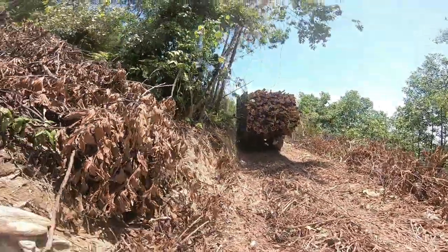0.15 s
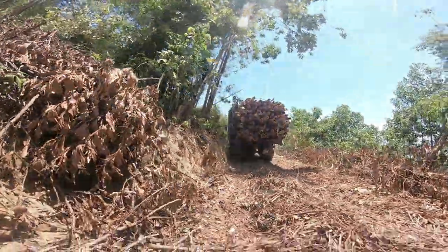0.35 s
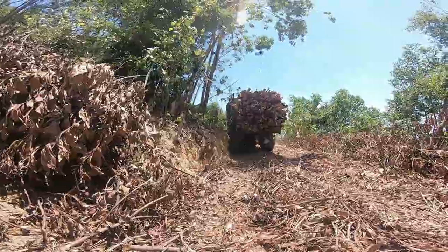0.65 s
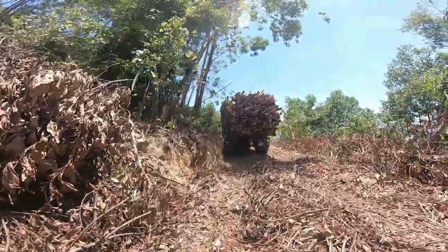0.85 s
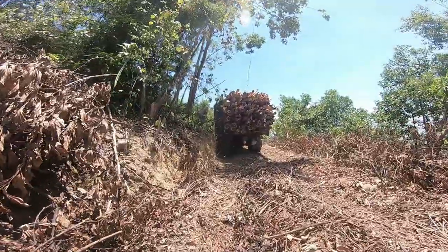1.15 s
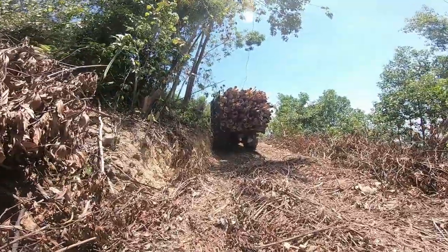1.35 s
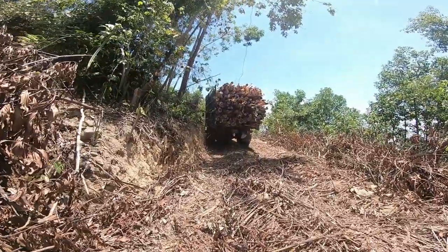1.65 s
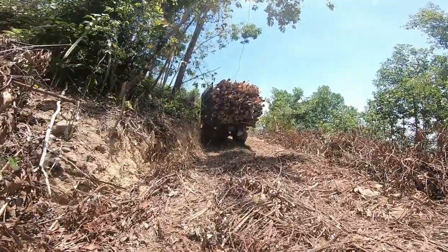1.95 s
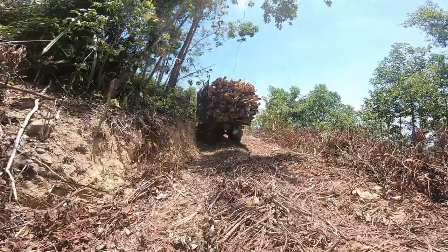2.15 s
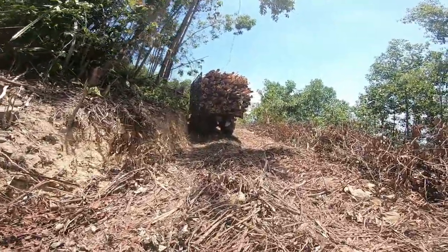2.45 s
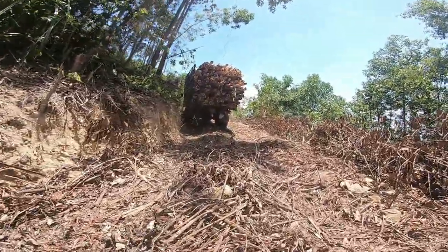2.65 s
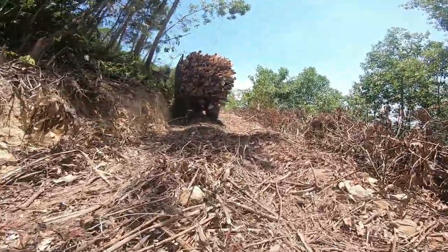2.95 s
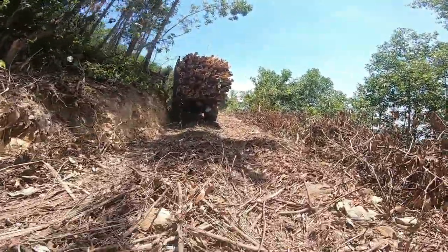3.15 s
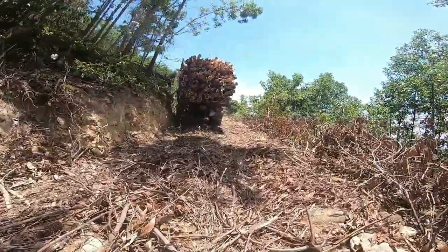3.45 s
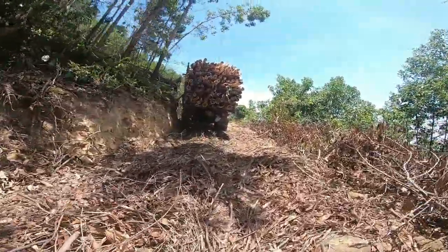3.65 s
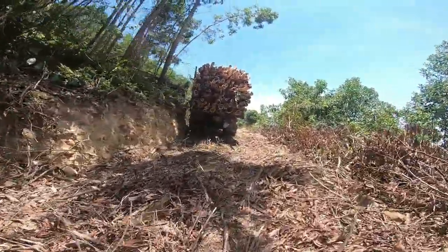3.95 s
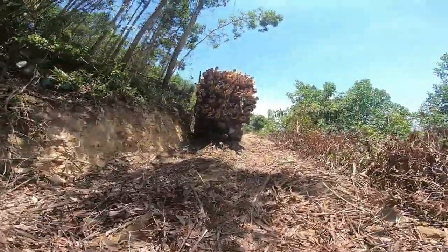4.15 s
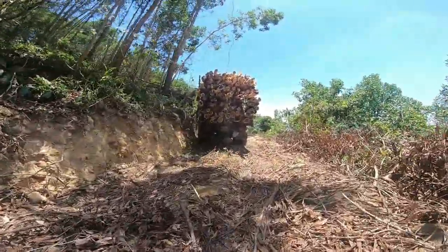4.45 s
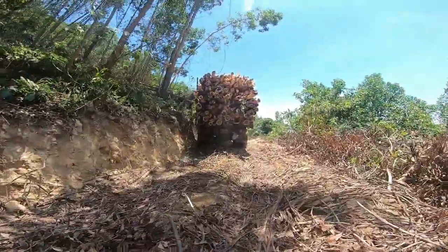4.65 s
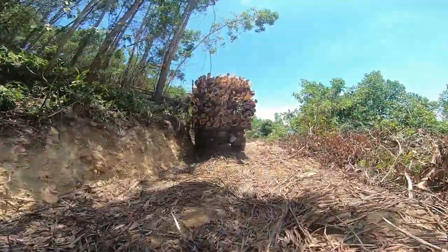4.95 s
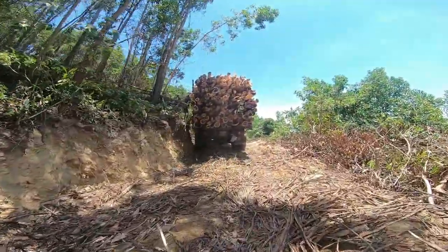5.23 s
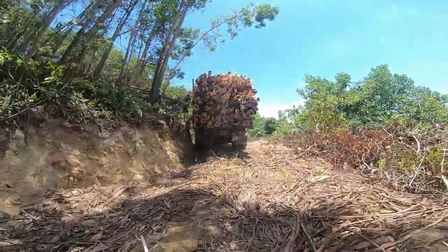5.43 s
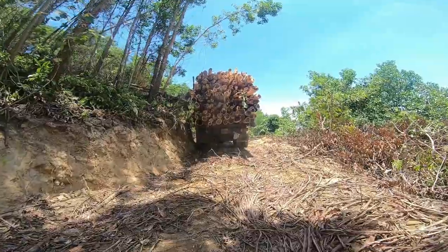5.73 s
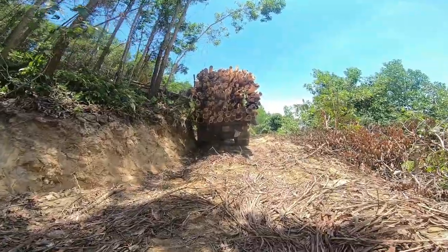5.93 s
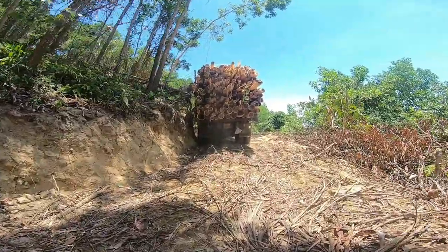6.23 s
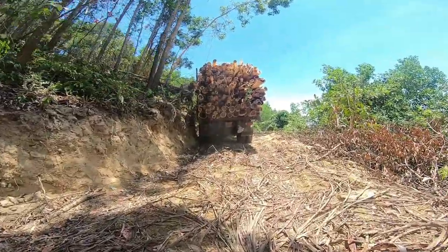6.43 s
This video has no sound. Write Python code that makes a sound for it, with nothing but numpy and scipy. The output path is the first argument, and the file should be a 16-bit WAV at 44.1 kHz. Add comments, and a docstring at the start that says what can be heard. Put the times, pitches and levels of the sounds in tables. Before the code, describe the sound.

A loaded diesel truck crawls along a forest track, heard from behind in the open air. Its uneven exhaust throbs at nearly steady revs over mechanical clatter and hiss. Close to the microphone, dry leaves and twigs crunch and snap as if underfoot, once near the start and then repeatedly. About halfway the engine takes up the load and pulls hard, then eases a little as a last few sticks break.

```python
"""A loaded four-cylinder diesel truck crawls along a forest track at nearly steady revs, heard from behind.
From the start its uneven exhaust throbs once an engine cycle, over a mechanical clatter and a hiss.
Dry leaves and twigs crunch and snap close by, as under footsteps, at about 0.5 s and from 1.5 s to 4 s.
From about 3 s the engine takes up the load and pulls hardest just after 5 s.
It then eases a little, while a last few sticks break."""
import sys
import numpy as np
from scipy import signal
from scipy.fft import rfft, irfft, next_fast_len
from scipy.io import wavfile
from scipy.ndimage import uniform_filter1d

SR = 44100
rng = np.random.default_rng(int(sys.argv[2]) if len(sys.argv) > 2 else 0)


def to_wav(sig):
    """Store sig (one row per channel, or 1-D mono) as 16-bit WAV at the path in sys.argv[1].

    Samples outside -1..1 are clipped; the rate is SR.
    """
    pcm = np.clip(np.atleast_2d(sig), -1, 1) * 32767
    pcm = np.round(pcm).astype(np.int16)
    wavfile.write(sys.argv[1], SR, pcm.T)  # frames by channels


N = 290617
TIME = np.arange(N) / SR
CUTOFF_HZ = 15700
GLIDE_PER_S = .035   # hiss bands and echo colour creep up by this share of their pitch as the truck rolls

# pitches at which the engine block and chassis ring: f/Hz, width/Hz, level/dB
BLOCK_RESONANCES = [(309, 14, -3), (403, 17, -1), (473, 55, -1), (600, 24, -2), (674, 34, -2.5),
                    (735, 26, -4), (789, 34, -7)]
# tone colour of dry leaves and twigs: f/Hz, level/dB
LEAF_COLOUR = [(300, -11), (700, 3.5), (1700, 7.5), (3300, 4), (5000, -0.5), (8000, -2.5), (10200, -6.5),
               (12000, -19.5), (16000, -29.5)]


def truck(rasp_db, hiss_db, width_db):
    """Exhaust, clatter, rasp, hiss and whine all keep time with the turning engine."""
    # engine speed as the driver feeds and eases the throttle: t/s, speed/rpm
    revs = [(0.0, 1778), (0.48, 1847), (1.24, 1845), (2.1, 1918), (2.57, 1803), (3.27, 1863), (3.6, 1920),
            (4.18, 1879), (4.65, 1889), (5.3, 1801), (5.72, 1903), (6.34, 1915), (6.59, 1797)]
    # how hard the engine works: t/s, pull (0 running light, about 1 pulling hard)
    effort = [(0, 0), (2.7, 0.07), (4.2, 0.85), (5.3, 1.07), (5.9, 0.71), (6.59, .65)]
    rpm, pull = in_time(revs), in_time(effort)
    cycles = np.cumsum(rpm) / (2 * 60 * SR) - .058   # one engine cycle is two turns of the crank
    drone = exhaust(cycles, rpm, pull, width_db)
    knocking = clatter(width_db) * beat(cycles, cycle_db=1.0, firing_db=-0.5, peak_at=0.45)
    treble = rasp(rasp_db, width_db) * beat(cycles, cycle_db=0.7, firing_db=0.6, peak_at=0.98)
    treble += hiss(hiss_db, width_db) * beat(cycles, cycle_db=0.1, firing_db=0.5, peak_at=0.85)
    return drone + whine(cycles, rpm, pull) + knocking + reflected(treble)


def exhaust(cycles, rpm, pull, width_db):
    """The pipe's note, the rumble of its swirling gas, and a boom that surges as the engine labours."""
    # loudness of the pipe's note: t/s, level/dB
    pipe_level = [(0, -18), (.5, -18), (.72, -15), (1.25, -15.5), (2.1, -16.5), (4.1, -17.5), (5.3, -17.5),
                  (6.59, -18)]
    # loudness of the firing boom: t/s, level/dB
    boom_level = [(0, -25), (.17, -22.3), (.48, -25.5), (.75, -24.5), (1.08, -26.5), (1.45, -22.7),
                  (1.63, -29.5), (1.95, -23.3), (2.3, -29.5), (2.62, -22.3), (3.52, -29.8), (3.75, -27.5),
                  (4.1, -30.2), (4.6, -31), (5.25, -25.3), (5.7, -28.8), (6.59, -26.5)]
    # tone colour of the swirling gas: f/Hz, level/dB
    gas_colour = [(20, -16), (35, -15), (60, -4), (125, -20), (180, -1.5), (220, -7), (260, -11),
                  (330, -23), (450, -38)]
    pipe, boom = exhaust_tones(cycles, rpm, pull)
    gas = from_db(-22 + 4 * pull) * noise(gas_colour, width_db - 5.5)   # louder under load
    return from_db(in_time(pipe_level)) * (pipe + gas) + from_db(in_time(boom_level)) * boom


def exhaust_tones(cycles, rpm, pull, cruise_rpm=1860, waver_db=2.0, rough_db=0.83):
    """Each cycle's strongest puff rings down the pipe; gives the note and the boom at an even level."""
    # exhaust tones, which slide over the pipe's resonances as the revs change: multiple of the cycle
    # rate, relative level running light/dB, relative level pulling/dB, change above cruise/(dB per rpm)
    tones = [(2, -53, -56, .05), (3, -43, -44, .13), (4, -26, -29, 0), (5, -34, -36, .04),
             (6, -39, -46, .02), (7, -32, -32, .07), (8, -17, -19, 0), (9, -32, -33, .01),
             (10, -36, -38, -.01), (11, -39, -35, .03), (12, -36, -36, -.09), (13, -48, -45, -.02),
             (14, -55, -52, 0), (15, -52, -39.5, .01), (16, -45, -34.5, -.01), (17, -54, -49, .07),
             (18, -58, -54, -.03), (21, -59, -59, 0), (30, -60, -57, 0), (31, -56, -56, 0)]
    multiples, light_db, pulling_db, db_per_rpm = np.transpose(tones)
    multiples = np.round(multiples).astype(int)
    # delay the tones so that they add up to a sudden puff that rings away (minimum phase)
    log_gain = np.interp(abs(np.arange(-64, 64)), multiples, np.log(from_db((light_db + pulling_db) / 2)))
    lags = signal.hilbert(log_gain).imag[64 + multiples]
    # an echo nearly half a cycle later fills the gaps in the throb without changing its colour
    lags += 2 * np.angle(1 + .7 * np.exp(-2j * np.pi * multiples * .47))
    out = np.zeros((2, N))
    for k, light, pulling, slope, lag in zip(multiples, light_db, pulling_db, db_per_rpm, lags):
        level_db = light + pull * (pulling - light) + slope * (rpm - cruise_rpm)
        level_db += waver_db * k / multiples[-1] * drift(3)   # high tones waver most
        row = int(k == 4)   # four firings a cycle make the boom, kept in its own row
        out[row] -= from_db(level_db) * np.cos(2 * np.pi * k * cycles - lag)
    out *= from_db(rough_db * drift(25))   # no two firings are alike
    return out / np.sqrt(uniform_filter1d(out ** 2, SR // 2))


def clatter(width_db, waver_db=2.0):
    """Moving parts make a rough noise and keep the engine block and chassis ringing."""
    # loudness of the clatter: t/s, level/dB
    loudness = [(0, -40.5), (1.1, -41.5), (2.1, -39.5), (2.7, -41.5), (4.25, -40.5), (4.6, -39),
                (6.59, -40)]
    # tone colour of its noise: f/Hz, level/dB
    colour = [(230, -10.5), (320, 1.5), (400, 0.5), (480, 0), (550, 0.5), (620, -1), (740, -10.5),
              (860, -12), (1100, -11.5)]
    gain = from_db(in_time(loudness) + drift(12))
    ringing = sum(from_db(db + waver_db * drift(2)) * np.sqrt(width) * narrow(hz, width)
                  for hz, width, db in BLOCK_RESONANCES)
    return gain * (from_db(-4.5) * rms_one(ringing) + from_db(-3.5) * noise(colour, width_db))


def rasp(rasp_db, width_db):
    """A harsh, flickering noise with a metal rattle in it."""
    # tone colour of the rasp: f/Hz, level/dB
    colour = [(650, -23.5), (850, -0.5), (1050, -1), (1350, 2.5), (1700, 3), (2100, 1), (2900, 4.5),
              (4000, -0.5), (4700, -14), (5500, -23.5)]
    gain = from_db(rasp_db + 0.81 * drift(20))
    harsh = from_db(-0.33) * noise(colour, width_db) * panned(-0.25)
    return gain * (harsh + from_db(-10.5) * rattle())


def rattle(waver_db=3.5, pitch_wander=.012):
    """Thin metal parts come and go, and shift in pitch as the chassis flexes."""
    # pitches at which the parts ring: f/Hz, width/Hz, level/dB
    metal_parts = [(1027, 130, -7.5), (1734, 58, -5), (1963, 81, -7.5), (2330, 48, -8), (2930, 75, -2.5),
                   (3816, 110, -3.5), (4054, 45, -12)]
    out = 0
    for hz, width, db in metal_parts:
        gain = from_db(db + waver_db * drift(2)) * np.sqrt(width)
        out += gain * wandering(hz * (1 + pitch_wander * drift(1)), width)
    return rms_one(out)


def hiss(hiss_db, width_db):
    """A fine, flickering hiss, with bands that swell, glide slowly upward and fade."""
    # tone colour of the hiss: f/Hz, level/dB
    colour = [(4000, 9.5), (4800, 7.5), (5300, 3.5), (6600, 5.5), (7600, 3), (8500, 0), (9600, -1),
              (10500, -5.5), (11700, -13), (13800, -16.5), (16000, -29)]
    # swelling bands: peak t/s, level/dB, f/Hz, width/Hz, half-length/s
    swells = [(0.11, -58.5, 9300, 900, .45), (3.9, -59, 9800, 1000, 0.8), (6.101, -58.5, 9700, 1300, 0.91),
              (5.2, -57.5, 6200, 900, 0.51), (6.25, -51.5, 6500, 1200, 0.61)]
    fine = from_db(hiss_db + 1.36 * drift(30)) * noise(colour, width_db)
    bands = 0
    for s, db, hz, width, half_length in swells:
        glide = hz * (1 + GLIDE_PER_S * (TIME - s))
        mid_and_side = np.array([wandering(glide, width), wandering(glide, width)])
        bands += from_db(db) * hump(s, half_length) * mid_and_side
    return fine + stereo(*bands, width_db)


def whine(cycles, rpm, pull, waver_db=1.5, slip_radians=.3):
    """Clean tones geared to the crank swell when the revs carry them onto a resonance of the block."""
    # the fifth harmonic of the firing, and the meshing gears:
    # multiple of the cycle rate, base level running light/dB, base level pulling/dB
    tones = [(20, -47.5, -52), (25.333, -49.5, -51), (26.47, -51, -62), (38, -56, -51), (50.667, -55, -61)]
    out = 0
    for multiple, light_db, pulling_db in tones:
        hz = multiple * rpm / (2 * 60)
        response = sum(1 / (1 + ((hz - centre) / (width / 2)) ** 2)
                       for centre, width, _ in BLOCK_RESONANCES)
        level_db = light_db + pull * (pulling_db - light_db) + waver_db * drift(4)
        phase = 2 * np.pi * multiple * cycles + slip_radians * drift(8)
        out += from_db(level_db) * np.sqrt(2 * response) * np.cos(phase)
    return out


def beat(cycles, cycle_db, firing_db, peak_at):
    """A gain that swells once a cycle and ripples with each of the four firings."""
    angle = 2 * np.pi * (cycles - peak_at)
    return from_db(cycle_db * np.cos(angle) + firing_db * np.cos(4 * angle))


def treble_levels(usual_hiss_db=-47, narrow_below_db=-50.5):
    """Rasp, hiss and stereo width rise and fall together."""
    # loudness of the hiss: t/s, level/dB
    hiss_level = [(0, -39), (.28, -46), (.8, -52.5), (1.3, -57), (2.05, -57.5), (2.25, -53), (2.93, -52.5),
                  (3.15, -45), (4.1, -45), (4.9, -48.5), (6.59, -47.5)]
    hiss_db = in_time(hiss_level)
    rasp_db = -42.0 + 0.3 * (hiss_db - usual_hiss_db)
    width_db = 4.5 - 3.8 * np.maximum(narrow_below_db - hiss_db, 0)   # narrows when the hiss is quiet
    return rasp_db, hiss_db, width_db


def snaps(width_db, middling_hz=2000, middling_ring_s=0.025):
    """A breaking stick gives a bright splintering crack and a short, dry ring of its wood."""
    # single sticks: t/s, strength/dB, wood f/Hz, wood band/octaves,
    # splinter against wood/dB, splinter f/Hz, left over right/dB
    sticks = [(.527, -20, 3870, 1.3, 3, 9500, -3), (.531, -18, 3900, .5, -12, 6000, -2),
              (.545, -25, 1700, 1.6, -11, 5000, 0), (0.553, -20.5, 3200, 1.8, -5, 6000, 2),
              (0.564, -15.5, 2930, 1.7, -15, 7000, -10), (.592, -23, 1600, 1.6, -12, 4500, -14),
              (.617, -30, 1700, 1.1, -14, 5000, 0), (1.575, -31, 3560, 1.4, -12, 5960, 0),
              (1.656, -35, 4500, 1.6, -2, 9500, 1), (1.79, -22, 2330, 1, -26, 5470, 1),
              (1.811, -26.5, 2700, 0.88, -16, 5500, -1), (1.982, -34, 4430, 1.3, -9, 7500, 0),
              (2.219, -30, 2200, 2.8, -9, 6960, 0), (2.325, -22, 1970, 1.05, -18, 6000, -2.5),
              (2.419, -27.5, 1950, 1.4, -1.5, 8500, 10), (2.426, -16.5, 1960, 0.89, -12.5, 8000, -3),
              (2.468, -25, 960, 0.44, -15, 4000, -1), (2.544, -18.5, 2750, 1, -20, 6000, -2),
              (2.934, -35, 4830, 1.3, 9, 10000, -11), (3.034, -27.5, 3000, 1.6, 7, 10000, -1),
              (3.128, -14, 1820, 0.38, -9.5, 2700, -5), (3.13, -19.5, 2100, 1.2, -7.5, 6000, -5),
              (3.329, -15.5, 2630, 1.7, -13, 5500, -5), (3.488, -20.5, 810, 1.1, -13, 3500, 1),
              (3.617, -21, 1740, 0.79, -14, 6000, -15), (3.631, -12, 3520, 2.06, -5, 6960, -5),
              (3.731, -32, 3500, 1.5, 4, 8500, 0), (5.061, -26, 2010, 0.99, -1.5, 7500, -7),
              (5.585, -27, 1800, 1.3, -16, 4500, -2), (6.453, -29, 3000, 1.3, 2, 10000, -1)]
    out, t = np.zeros((2, N)), TIME[:SR // 8]
    for s, db, hz, octaves, splinter_db, splinter_hz, pan_db in sticks:
        at = round(s * SR)
        # thinner sticks sound higher and die away sooner
        ring_s = middling_ring_s * np.exp(-0.17 * np.log2(hz / middling_hz))
        decay = from_db(-60 * t / ring_s)
        burst = rng.standard_normal((2, len(t))) * decay
        wood = band_passed(burst, hz, octaves)
        splinter = band_passed(burst * decay, splinter_hz, octaves=1.37)   # dies twice as fast
        size = .5 * np.linalg.norm(decay)   # a longer break carries more energy
        wood, splinter = (size * x / np.linalg.norm(x, axis=1, keepdims=True) for x in (wood, splinter))
        mid, side = wood + from_db(splinter_db) * splinter
        crack = left_right(mid, 0.34 * from_db(width_db[at]) * side)
        out[:, at:at + len(t)] += (from_db(db) * panned(pan_db) * crack)[:, :N - at]
    return filtered(out, 9, 10100) + from_db(-14.5) * filtered(out, 9, 10100, "high")   # a softer top


def crunches(width_db, split_hz=5800):
    """As under a footstep, a bunch of twigs gives way in a swelling shower of tiny breaks."""
    # crushed bunches of twigs and leaves: peak t/s, level/dB, rise/s, fall/s, extra treble/dB
    bunches = [(0.014, -29.5, 0.013, 0.037, 0), (0.554, -24, 0.018, 0.015, 1),
               (.589, -37.5, .016, 0.19, -0.5), (.79, -49, 0.035, 0.026, -2),
               (1.453, -40.5, 0.0077, 0.066, -0.5), (2.14, -40.5, 0.0088, .04, -19),
               (2.254, -34, 0.011, 0.0091, -13), (2.365, -38, 0.066, 0.035, -5),
               (3.035, -35, 0.037, 0.039, -1.5), (3.292, -28.5, 0.0058, 0.004, 4.5),
               (3.364, -31.5, 0.016, 0.03, 4), (3.604, -26.5, 0.04, 0.015, 1),
               (4.015, -33, .009, 0.0088, -8), (5.925, -36, 0.014, 0.0082, -7)]
    grains = stereo(*tiny_breaks(per_s=5000, spread_db=2.0), width_db + 5.0)
    body = filtered(grains, 2, split_hz)
    out = 0
    for s, db, rise, fall, treble_db in bunches:
        fade = np.maximum((s - TIME) / rise, (TIME - s) / fall)
        swell = np.exp(-np.minimum(fade, 20))
        out += from_db(db) * swell * (body + from_db(treble_db) * (grains - body))
    return out * panned(-2.4)


def crackle(rasp_db, width_db):
    """Dry leaves tick faintly all along the track."""
    ticks = tiny_breaks(per_s=200, spread_db=8.5, waver_db=2)
    return from_db(rasp_db - 19.0) * stereo(*ticks, width_db)


def tiny_breaks(per_s, spread_db, waver_db=0):
    """Leaves and twigs click at random moments, most faintly, a few strongly; gives mid and side."""
    sizes = from_db(spread_db * np.minimum(rng.exponential(1, N), 4))
    clicks = (rng.random(N) < per_s / SR) * sizes * rng.standard_normal((2, N))
    if waver_db:
        clicks *= from_db(waver_db * drift(2.8))
    return shaped(clicks, LEAF_COLOUR)


def thuds():
    """Soft, dull thuds close by, like footsteps."""
    # each thud: peak t/s, level/dB, f/Hz near the top of the band, half-length/s
    moments = [(0.504, -27, 234, 0.037), (0.592, -34, 613, 0.03), (5.6, -40, 45, 0.031)]
    out = 0
    for s, db, hz, half_length in moments:
        mid, side = rms_one(filtered(rng.standard_normal((2, N)), 2, [hz / 2.1, hz * 1.13], "band"))
        out += from_db(db) * np.exp(-((TIME - s) / half_length) ** 2) * left_right(mid, side)
    return out


def buzzes():
    """Loose panels sing for a moment as the chassis twists."""
    # singing panels: peak t/s, level/dB, f/Hz, width/Hz, half-length/s
    panels = [(2.0, -43.5, 405, 21.8, 0.33), (2.72, -50.5, 3940, 307, 0.31), (5.0, -48, 715, 80, 0.52),
              (5.654, -42.5, 3600, 630, 0.013)]
    return sum(from_db(db) * narrow(hz, width) * hump(s, half_length)
               for s, db, hz, width, half_length in panels)


def flickers(count=110, low_hz=1002, high_hz=4400, top_db=-54, spread_db=6, half_length_s=.05, bend=0.059):
    """Faint, brief tones flicker at scattered pitches, each bending a little."""
    out, t = np.zeros(N + SR), TIME[:SR // 2] - TIME[SR // 4]
    for when, pitch, faintness, direction in rng.random((count, 4)):
        hz = low_hz * (high_hz / low_hz) ** pitch * (1 + bend * (direction - .5) * t)
        tone = np.exp(-(t / half_length_s) ** 2) * np.sin(2 * np.pi * np.cumsum(hz) / SR)
        at = int(when * N)
        out[at:at + len(t)] += from_db(top_db - spread_db * faintness) * tone
    return out[:N]


def reflected(x, strength=.17, spread_s=.0048, sway_s=.0001, count=8):
    """Quick echoes off the rutted ground and the load colour the sound, shifting as the truck rolls."""
    out = x.copy()
    delays = np.linspace(spread_s / 5, spread_s, count) * rng.uniform(.92, 1.08, count)
    for k, delay in enumerate(delays):
        sent_at = TIME - delay * np.exp(-GLIDE_PER_S * TIME) - sway_s * drift(0.73)
        out += (-1) ** k * strength * np.array([np.interp(sent_at, TIME, channel) for channel in x])
    return out / np.sqrt(1 + count * strength ** 2)


def from_db(db):
    """Turns decibels into a gain."""
    return 10 ** (np.asarray(db) / 20)


def rms_one(x):
    """Scales x to an average strength (rms) of 1."""
    return x / np.sqrt(np.mean(x ** 2) + 1e-20)


def in_time(points):
    """Joins (time, value) points with straight lines."""
    return np.interp(TIME, *np.transpose(points))


def hump(peak_s, half_length_s):
    """A flat-topped swell and fade."""
    return 1 / (1 + ((TIME - peak_s) / half_length_s) ** 4)


def drift(per_s):
    """A random wobble of typical size 1; per_s sets its speed."""
    knots = rng.standard_normal(int(N / SR * per_s * 2) + 3)
    return rms_one(np.interp(TIME * per_s * 2, np.arange(len(knots)), knots))


def filtered(x, order, hz, kind="low"):
    """Keeps the lows, the highs or a band of x; a higher order cuts more steeply."""
    return signal.sosfilt(signal.butter(order, hz, kind, fs=SR, output="sos"), x)


def band_passed(x, hz, octaves):
    """A band of x some octaves wide."""
    return filtered(x, 2, [hz * 2 ** (-octaves / 2), min(hz * 2 ** (octaves / 2), CUTOFF_HZ)], "band")


def coloured(x, colour):
    """Filters x by a line of (Hz, dB) points, held level beyond its ends."""
    hz, db = np.transpose(colour)
    size = next_fast_len(N + 4000)
    bins = np.maximum(np.arange(size // 2 + 1) * SR / size, 1)
    gain = from_db(np.interp(np.log(bins), np.log(hz), db))
    return irfft(rfft(x, size) * gain, size)[..., :N]


def shaped(x, colour):
    """Gives x a tone colour that falls away beyond both ends; rms 1."""
    return rms_one(coloured(x, [(colour[0][0] / 2, -90), *colour, (colour[-1][0] * 2, -90)]))


def noise(colour, width_db):
    """Stereo noise of a given tone colour."""
    return stereo(*shaped(rng.standard_normal((2, N)), colour), width_db)


def narrow(hz, width):
    """One resonance kept ringing by noise; rms 1."""
    return rms_one(filtered(rng.standard_normal(N), 2, [hz - width / 2, hz + width / 2], "band"))


def wandering(hz, width):
    """A band of noise whose centre follows the curve hz; rms 1."""
    a, b = rms_one(filtered(rng.standard_normal((2, N)), 3, width / 2))
    phase = 2 * np.pi * np.cumsum(hz) / SR
    return a * np.cos(phase) + b * np.sin(phase)


def panned(pan_db):
    """Left and right gains; above 0 dB leans left."""
    return from_db([[pan_db / 2], [-pan_db / 2]])


def left_right(mid, side):
    """Mid is what both ears share; side is how they differ."""
    return mid + side * [[1], [-1]]


def stereo(mid, side, width_db):
    """Left and right, wider towards the treble."""
    # width at each pitch: f/Hz, side against mid/dB
    spread = [(50, -31), (250, -39.5), (600, -16), (1500, -13), (3000, -14.5), (4100, -18), (5500, -7),
              (8500, -3), (12000, -6.5)]
    return left_right(mid, coloured(side, spread) * from_db(width_db))


def scene():
    """The truck and the breaking brushwood, in the open air."""
    rasp_db, hiss_db, width_db = treble_levels()
    brushwood = crunches(width_db) + crackle(rasp_db, width_db) + snaps(width_db)
    faint_tones = buzzes() + flickers()
    return truck(rasp_db, hiss_db, width_db) + brushwood + thuds() + faint_tones


def record(dry):
    """The highest treble is cut off steeply."""
    return signal.sosfilt(signal.ellip(10, .1, 80, CUTOFF_HZ, fs=SR, output="sos"), dry)


dry = scene()
out = record(dry)
to_wav(out)
```